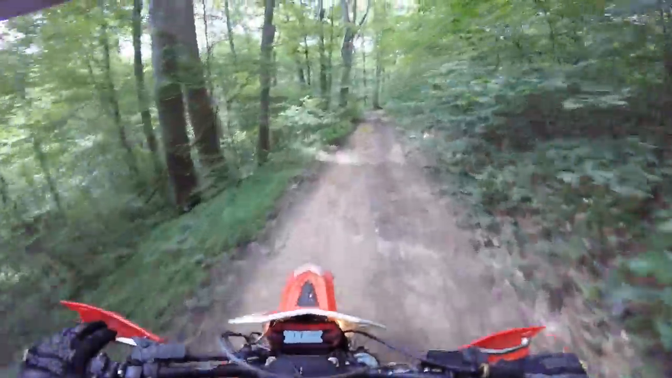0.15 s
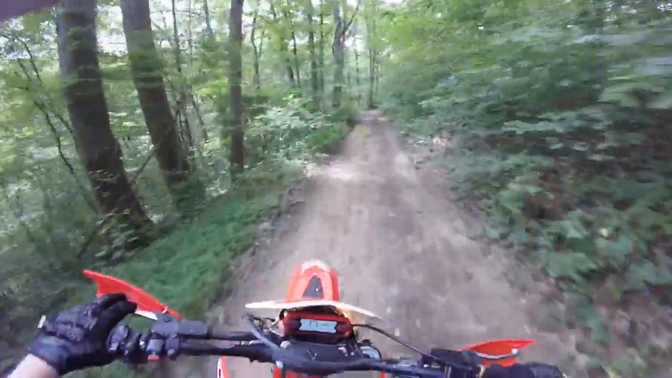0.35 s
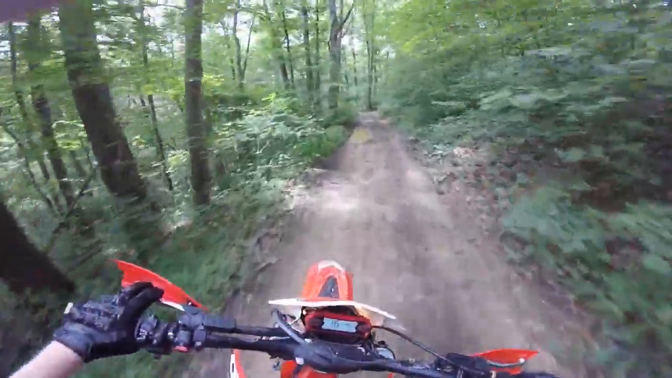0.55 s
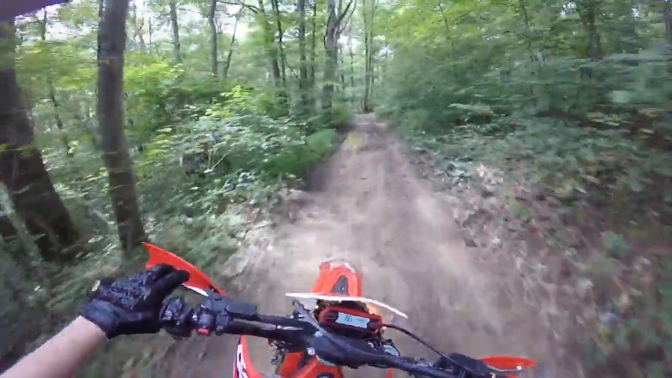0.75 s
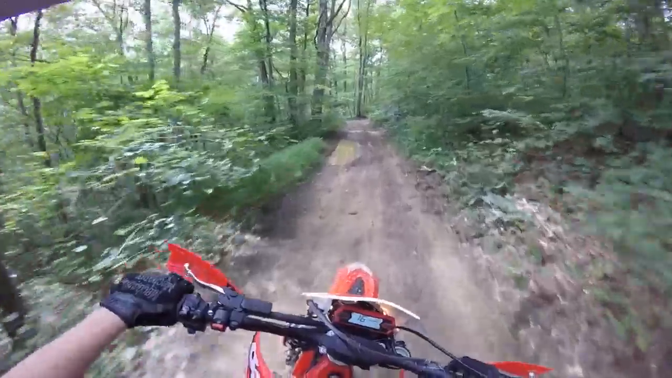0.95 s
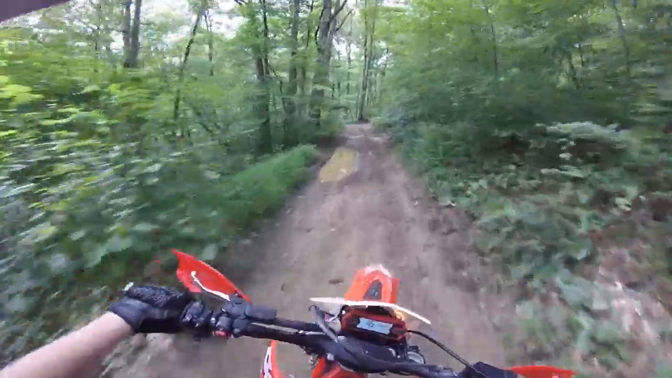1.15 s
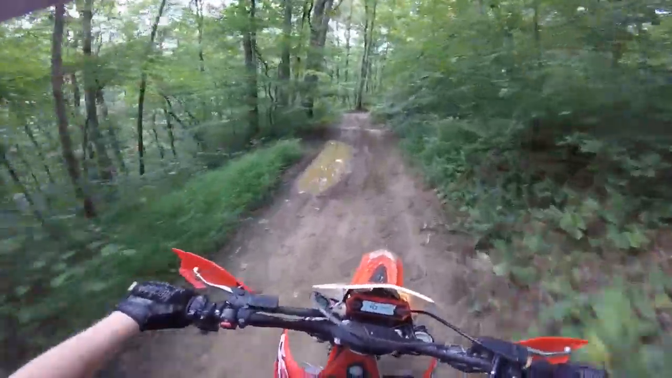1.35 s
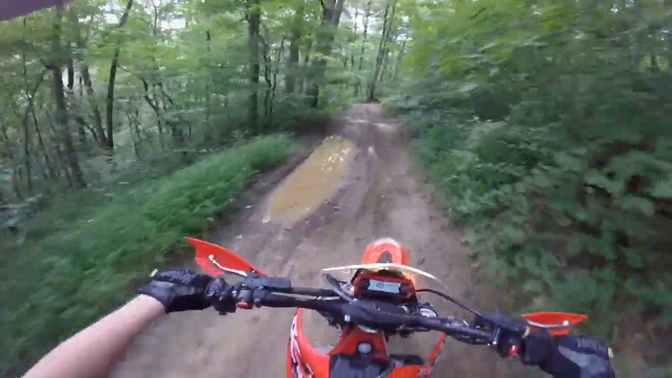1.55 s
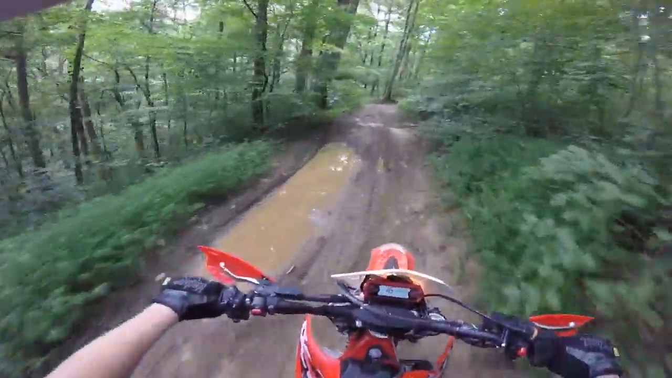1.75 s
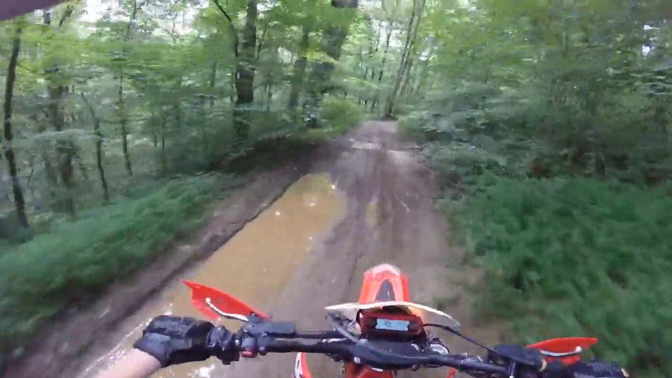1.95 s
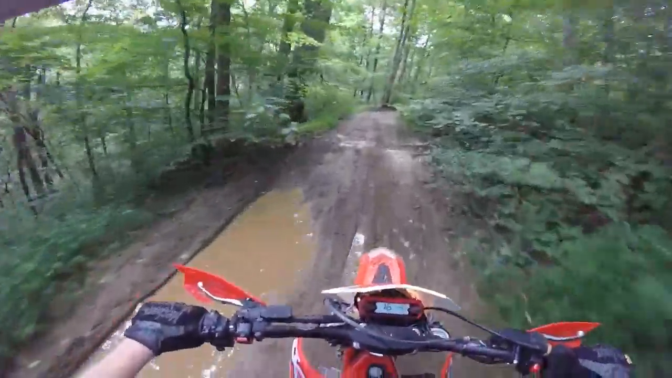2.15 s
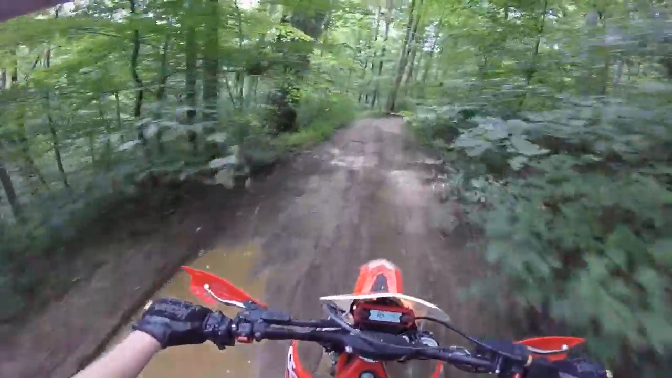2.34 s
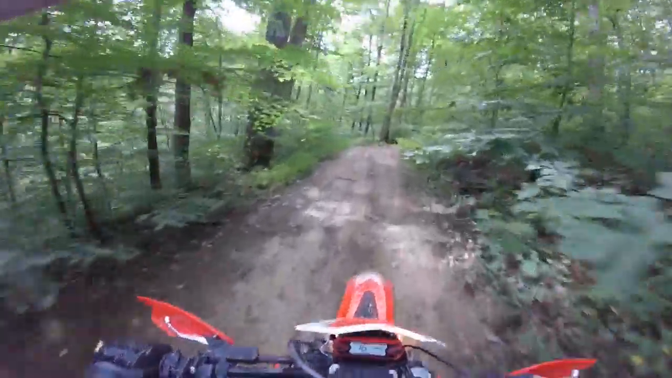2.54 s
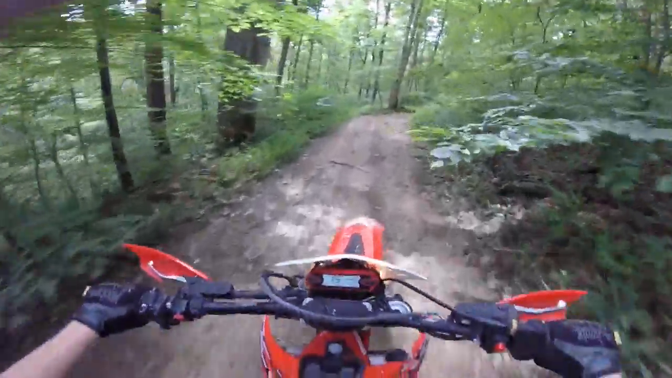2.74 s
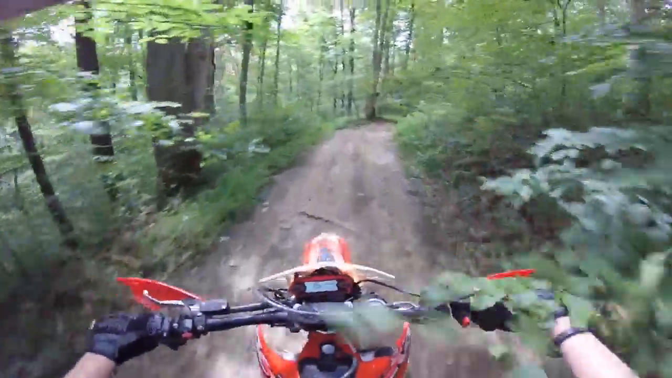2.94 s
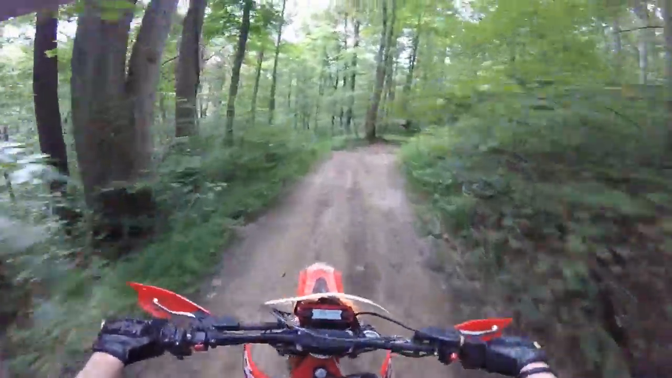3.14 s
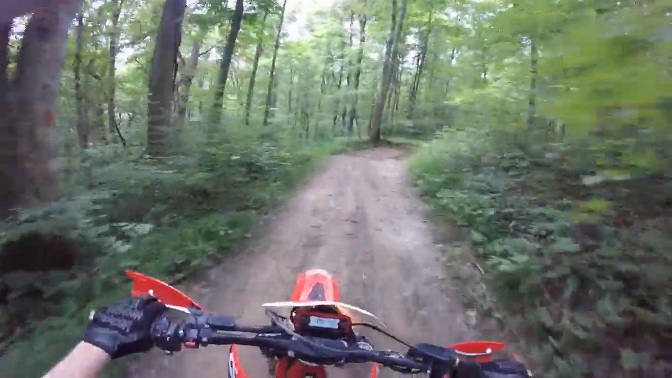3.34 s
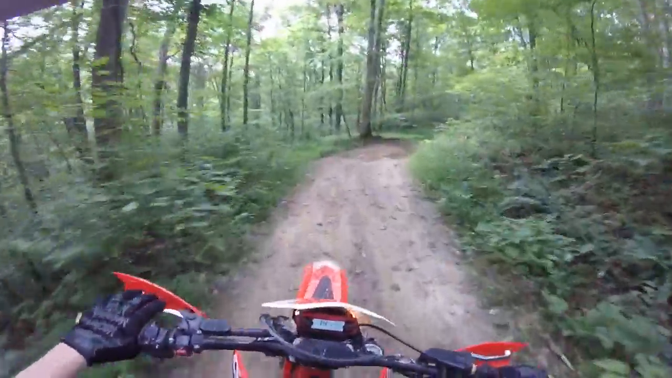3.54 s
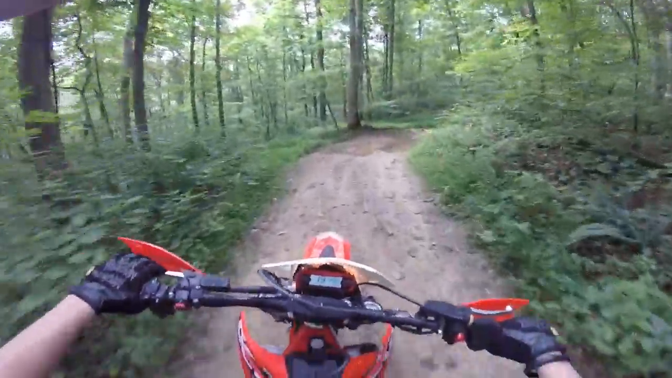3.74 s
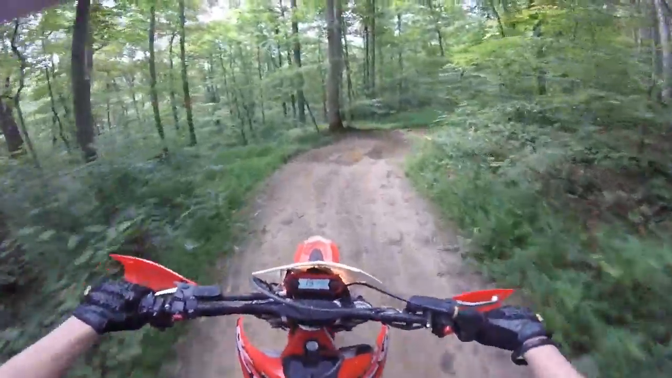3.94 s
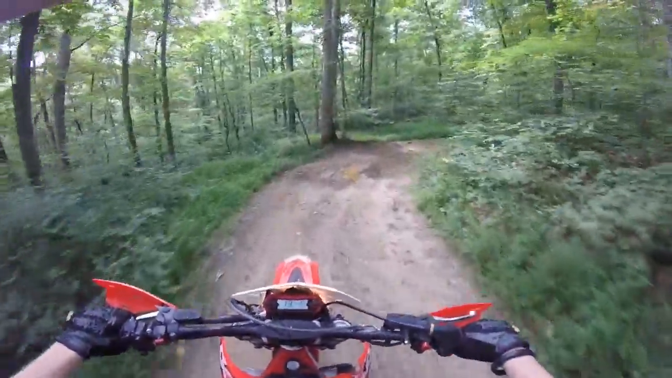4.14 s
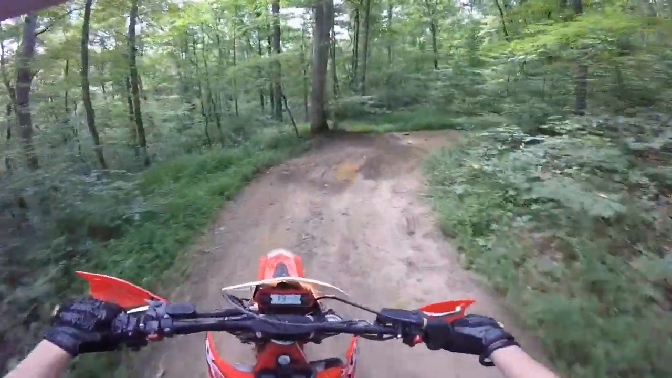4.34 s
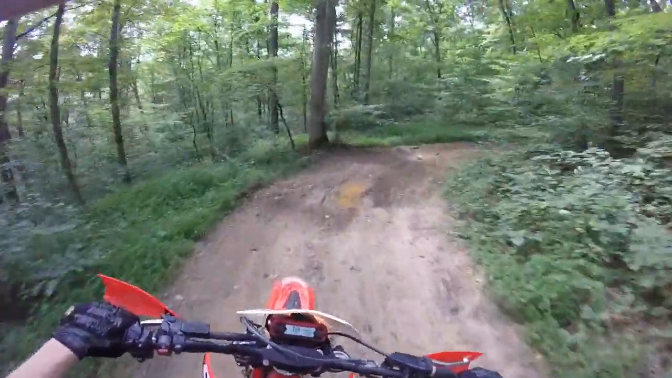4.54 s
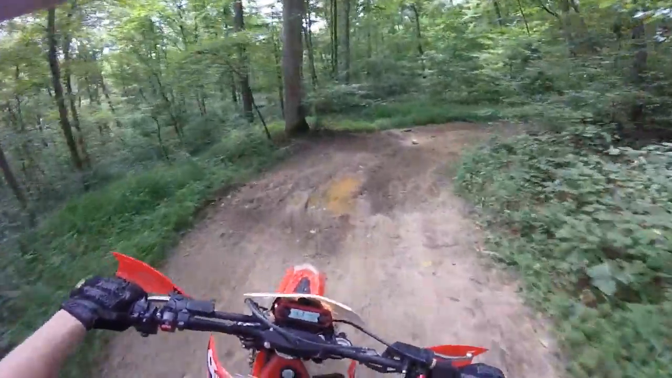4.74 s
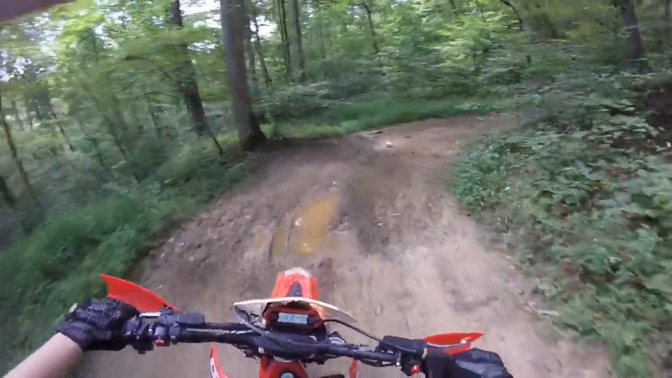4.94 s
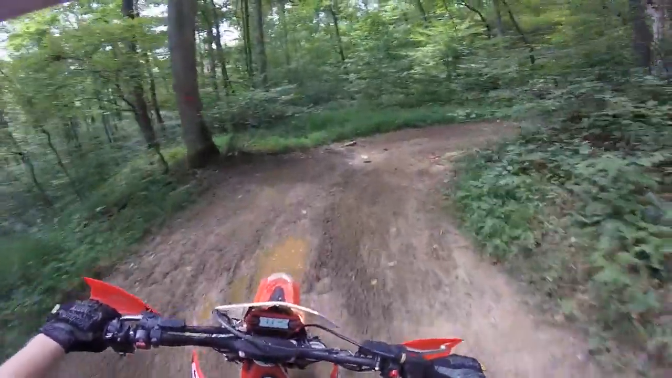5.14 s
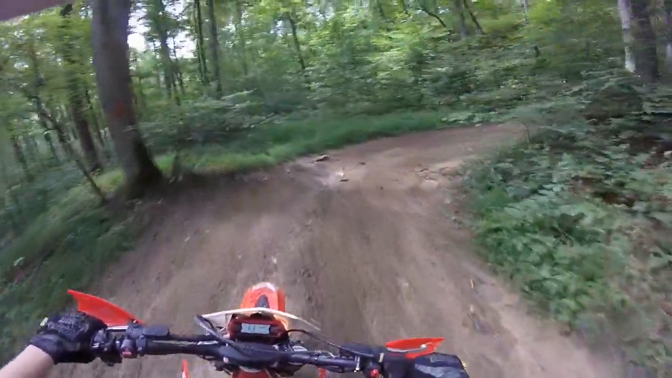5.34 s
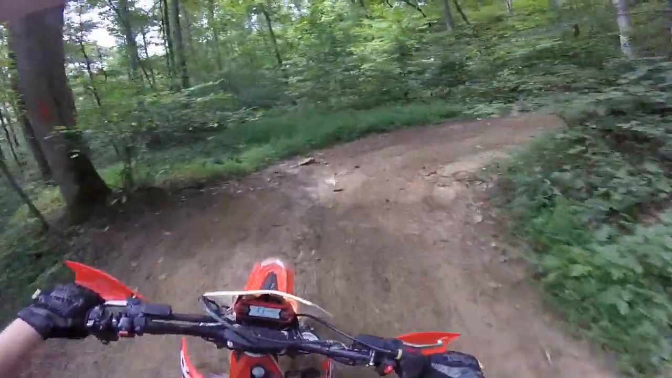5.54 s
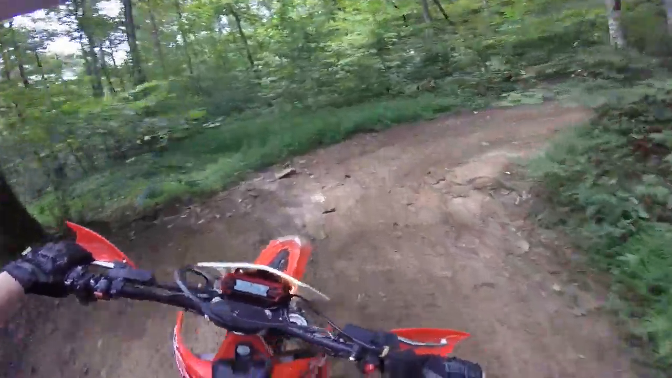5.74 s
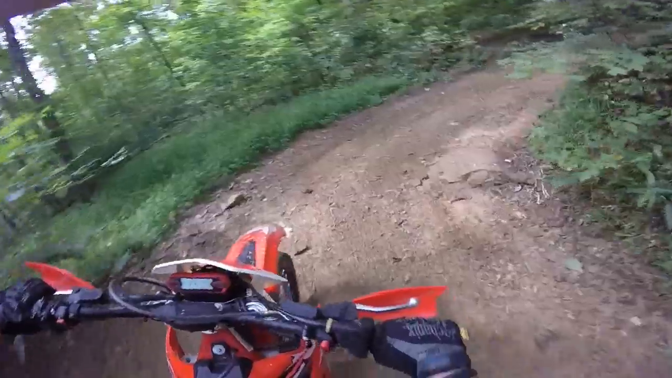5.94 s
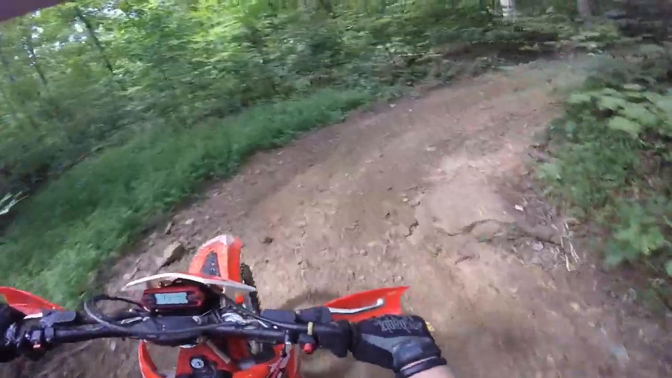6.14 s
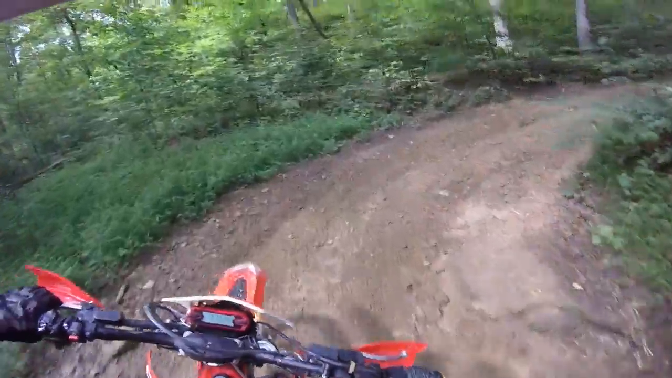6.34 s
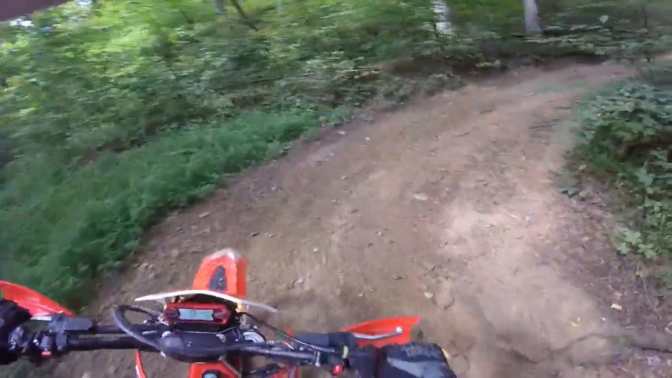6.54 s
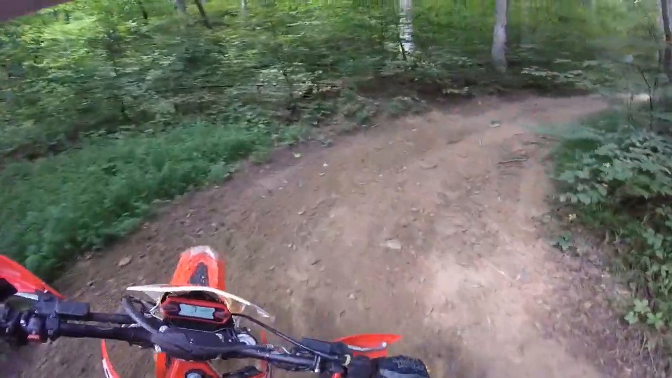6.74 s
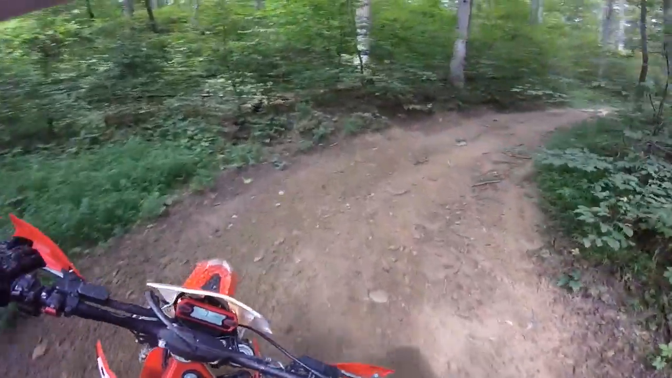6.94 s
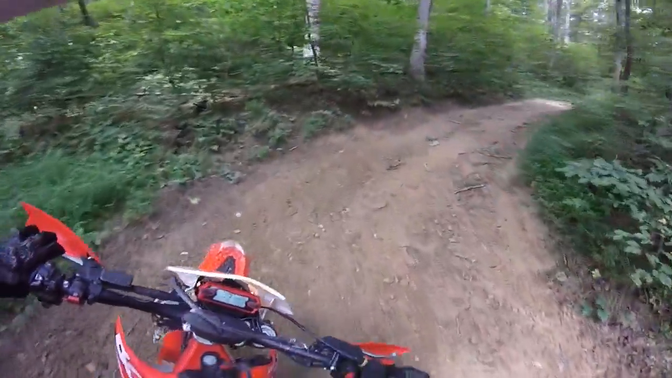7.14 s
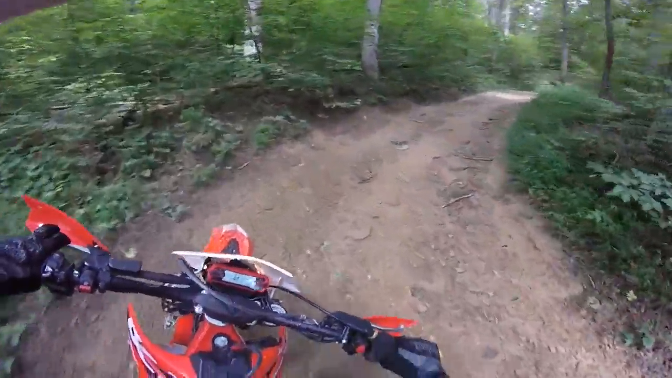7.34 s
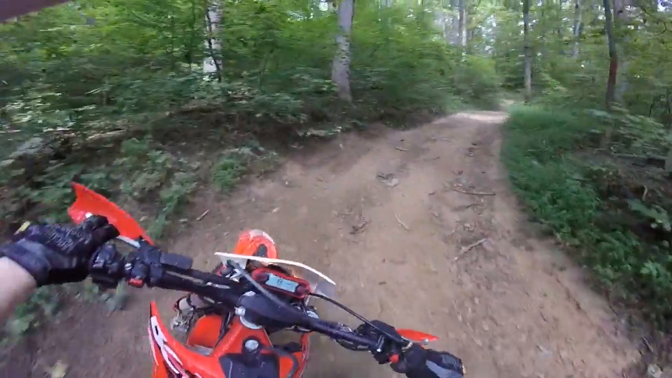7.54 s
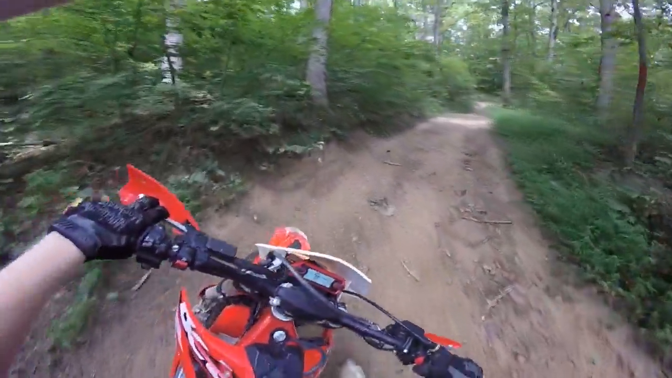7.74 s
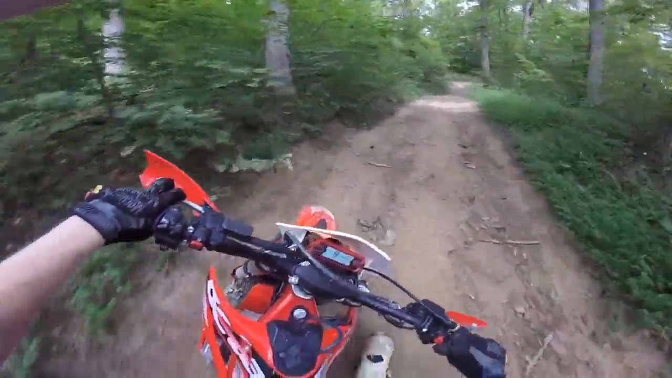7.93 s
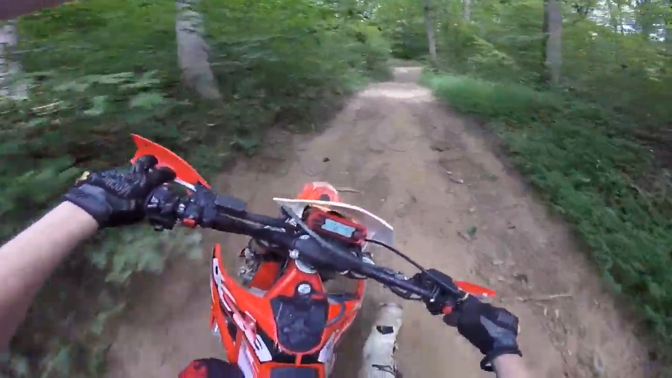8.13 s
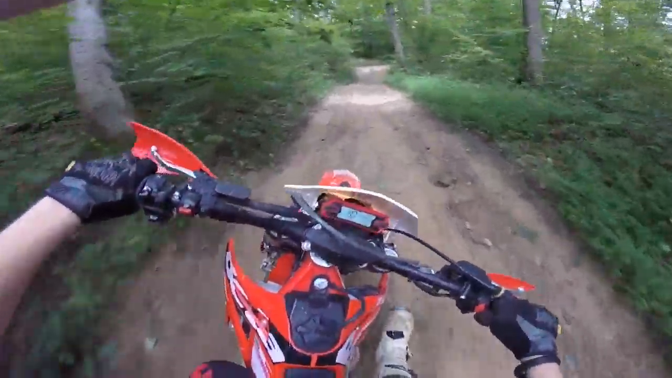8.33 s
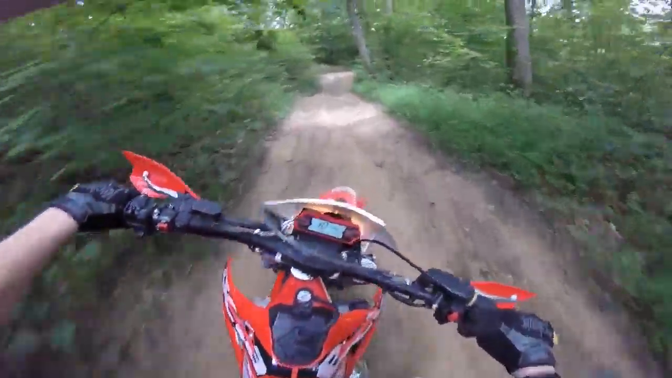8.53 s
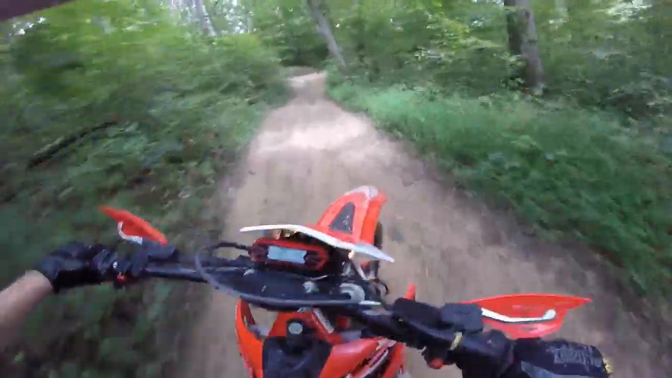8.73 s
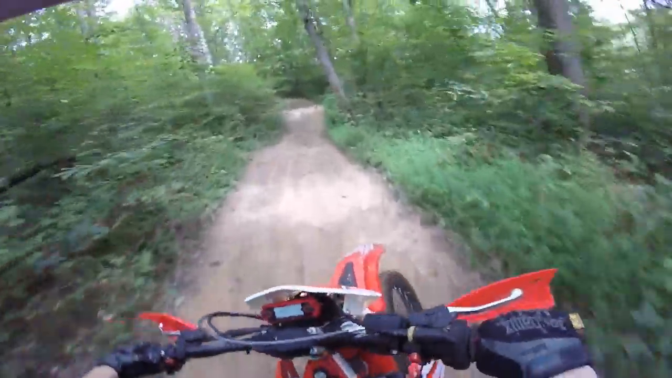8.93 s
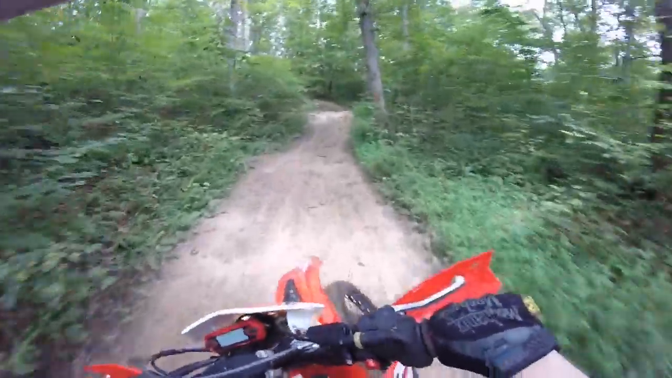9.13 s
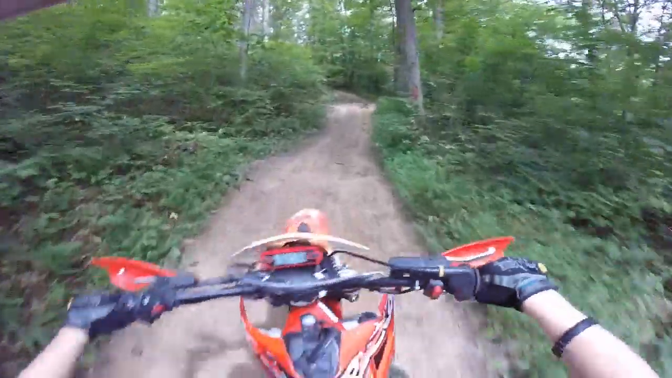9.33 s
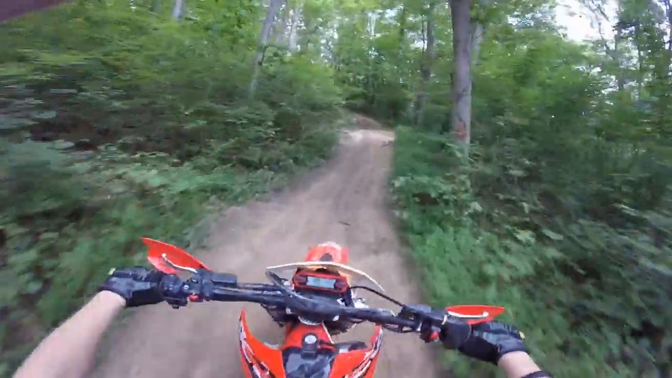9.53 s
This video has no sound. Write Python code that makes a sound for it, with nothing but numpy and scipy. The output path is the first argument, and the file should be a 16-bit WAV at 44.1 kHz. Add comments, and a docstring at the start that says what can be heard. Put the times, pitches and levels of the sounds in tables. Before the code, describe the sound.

A small two-stroke dirt bike drones off the throttle down a forest trail, popping and sputtering, slows, then pulls hard with a rising bark.

```python
"""A two-stroke dirt bike engine on a forest trail, heard at the rider's helmet.
Pulses timed by the crankshaft excite pipe and airbox spectra: a drone off the throttle, two hard pulls on it.
Lone firings pop as decaying pipe modes; light throttle adds burbles; pops under load ping the barrel.
Filtered noise gives piston and gear rattle, tyre hiss, scrubs, knocks and lumpy wind.
A limiter ducks everything at loud peaks and recovers slowly."""
import sys
import numpy as np
from scipy import signal
from scipy.fft import rfft, irfft, next_fast_len
from scipy.io import wavfile
from scipy.ndimage import uniform_filter1d, minimum_filter1d

SR = 44100
rng = np.random.default_rng(int(sys.argv[2]) if len(sys.argv) > 2 else 0)


def digitize_waveform(pressure):
    """Quantize a signal to 16-bit integers and store it at the path in sys.argv[1].

    Rows of a 2-D input are taken as channels; values are limited to [-1, 1].
    """
    field = np.atleast_2d(pressure).T
    bounded = np.clip(field, -1, 1)
    quanta = np.round(bounded * 32767).astype(np.int16)
    wavfile.write(sys.argv[1], SR, quanta)


N = 426888
TIME = np.arange(N) / SR


# crankshaft speed: (time [s], speed [rev/s])
CRANK_SPEED = [(0, 52.9), (.2, 51.4), (.33, 53), (.44, 52.6), (.54, 51), (.6, 53), (.78, 51.3), (.99, 52.1),
               (1.12, 50.3), (1.2, 50.8), (1.33, 49.8), (1.42, 54), (1.95, 50.7), (2.09, 48.3),
               (2.18, 51.4), (2.27, 51), (2.47, 48.6), (2.6, 54), (2.86, 47), (2.94, 52), (3.18, 40.5),
               (3.38, 45.4), (3.7, 41.2), (3.81, 42.8), (4.2, 37.7), (4.4, 36.3), (5.0, 34.8), (5.78, 34.9),
               (6.2, 45.5), (6.45, 42), (6.66, 50.5), (6.75, 51), (6.95, 41), (7.1, 45), (7.3, 40.5),
               (7.68, 42.5), (7.76, 45), (7.9, 45.2), (8.0, 52.2), (8.085, 55.3), (8.18, 50), (8.27, 57.6),
               (8.32, 53.4), (8.4, 59.6), (8.53, 61.4), (8.62, 67.8), (8.72, 70), (8.92, 51.5),
               (9.09, 48.5), (9.15, 60), (9.2, 75), (9.25, 82), (9.335, 75.3), (9.48, 73.3), (9.68, 57)]


def crank_rev_per_s():
    """Engine speed at every sample."""
    return in_time(CRANK_SPEED)[0]


def by_revs(level_db, per_octave_db, cruise_rev_per_s=50):
    """Gain: level_db at cruising revs, plus per_octave_db for each doubling of engine speed."""
    return from_db(level_db + per_octave_db * np.log2(crank_rev_per_s() / cruise_rev_per_s))


def port_openings():
    """The exhaust port opens once a revolution; the phase is bent so that pops fall on openings."""
    turns = np.cumsum(crank_rev_per_s()) / SR
    pop_s = pops()[0]
    phase_error = np.unwrap(np.interp(pop_s, TIME, turns), period=1)
    turns = turns - np.interp(TIME, pop_s, phase_error)
    return TIME[1:][np.diff(np.floor(turns)) > 0]


# pulls on the throttle: (start [s], end [s], gain [dB])
THROTTLE_PULLS = [(6.949, 8.79, -5), (9.073, 9.464, -12)]


def throttle(open_s=0.013, close_s=0.019):
    """One row per pull: 1 while the throttle is open, 0 while coasting."""
    return np.array([held(start, end, open_s, close_s) for start, end, *_ in THROTTLE_PULLS])


def load():
    """How hard the engine pulls as a gain, 0 while coasting."""
    return from_db(np.transpose(THROTTLE_PULLS)[2]) @ throttle()


# throttle opening during the pulls: (time [s], level [dB])
THROTTLE_OPENING = [(6.95, -4.5), (7.88, -3), (7.97, -1), (8.1, 4), (8.17, -1), (8.24, -1), (8.32, 2),
                    (8.6, -3), (8.69, -6), (8.78, -23), (9.1, -1.5), (9.47, -17.5)]
# exhaust resonances under throttle, from low to high revs: (frequency [Hz], relative level [dB])
LUGGING_SPECTRUM = [(45,-24), (90,-8.5), (150,-24.5), (220,-9), (268,5), (310,-3.5), (360,-14.5), (405,0),
                    (455,-9.5), (575,-10), (640,-29), (730,-38), (1500,-65.5)]
MIDRANGE_SPECTRUM = [(55,-17), (110,-8.5), (175,-20), (240,5.5), (300,3.5), (325,3.5), (372,-18), (435,-6),
                     (490,-4), (600,-26.5), (670,-12), (770,-33), (830,-60), (925,-23), (1050,-55),
                     (1400,-33), (1600,-60)]
ON_THE_PIPE_SPECTRUM = [(69,-21.5), (138,-20), (207,-11), (276,0.5), (345,-6.5), (414,-6), (483,-9.5),
                        (620,-5), (690,-14), (830,-53), (1350,-36), (1600,-50)]
FLAT_OUT_SPECTRUM = [(78,-11.5), (155,-14), (235,-6), (305,3.5), (385,-5), (485,1), (570,-2), (650,2),
                     (730,-5.5), (820,-24), (1000,-61), (1300,-16), (1600,-54)]
# crossfades from each exhaust spectrum to the next: (from [rev/s], to [rev/s])
SPECTRUM_SHIFTS = [(46, 52), (62, 66), (71, 74)]
# hiss of the gas jet: (frequency [Hz], relative level [dB])
RASP_SPECTRUM = [(1800,-10), (2500,-2.5), (3200,4.5), (3800,-3), (4500,-1.5), (5600,-6.5), (6150,-0.5),
                 (6800,2.5), (7500,-5), (9000,-6.5), (10500,-11.5), (15000,-20)]


def pulling(openings, bark_hz=400, bark_db=0.0, boom_follows=0.22, echo_s=0.00442):
    """Every turn fires: the expansion chamber booms evenly, the silencer barks roughly, the jet rasps."""
    boom_turbulence, bark_turbulence = 0.06, 0.2
    silencer_echo, echo_wander = 0.35, 0.05
    revs = crank_rev_per_s()
    open_db, = in_time(THROTTLE_OPENING)
    boom_gain = from_db(boom_follows * open_db)

    firings = -scatter(openings - .002, spread_db=.5, jitter_s=.00003)
    gas = steady(noise() * fade(firings, 0.019))
    boom = diffuse(steady(firings) + boom_turbulence * gas, delays_s=(.0036,), echo=-0.51)

    cracks = -scatter(openings - .002, spread_db=1.5, jitter_s=.00005)
    bark = steady(cracks) + bark_turbulence * gas
    # the silencer echo's delay wanders at random, so its resonances shift
    echo_time = TIME - echo_s * (1 + echo_wander * drift(11))
    bark = steady(bark + silencer_echo * np.interp(echo_time, TIME, bark))

    low = crossover(boom, bark_hz, "low") * boom_gain
    high = crossover(bark, bark_hz, "high") * from_db(bark_db + open_db)
    blasts = low + high

    # the exhaust resonances shift with the revs
    note = colour(blasts, LUGGING_SPECTRUM)
    higher_spectra = (MIDRANGE_SPECTRUM, ON_THE_PIPE_SPECTRUM, FLAT_OUT_SPECTRUM)
    for spectrum, speeds in zip(higher_spectra, SPECTRUM_SHIFTS):
        note = note + np.interp(revs, speeds, (0, 1)) * (colour(blasts, spectrum) - note)
    note = steady(note) * boom_gain * by_revs(level_db=3.0, per_octave_db=13.5)
    rasp = steady(colour(gas, RASP_SPECTRUM)) * by_revs(level_db=-28.0, per_octave_db=18.5)
    return load() * (note + rasp)


# runs of evenly spaced lone firings:
# (first [s], last [s], count, peak of the ringing [dB], extra ring of the upper modes [dB])
LONE_FIRINGS = [(1.348, 1.348, 1, -12, -13), (1.368, 1.444, 3, 0.5, 1), (1.461, 1.575, 4, 5, 1),
                (1.6316, 1.7094, 3, 5.5, 4), (1.7477, 1.8049, 2, 1, 15), (1.7662, 1.8812, 3, 7.5, 1),
                (2.521, 2.521, 1, 1, 7), (2.615, 2.632, 2, 2.5, 0), (2.917, 2.956, 2, 6.5, -1),
                (4.264, 4.264, 1, -2, 13), (4.536, 4.617, 2, -13, -2), (4.813, 4.978, 2, -3.5, -4),
                (5.1746, 5.316, 2, -4, 3), (5.46, 5.517, 2, -10, -5), (5.577, 5.634, 2, -4.5, -2),
                (5.719, 5.719, 1, -12, 0), (5.804, 5.860, 2, -3, 3), (5.884, 6.034, 3, -1, -1),
                (6.104, 6.237, 3, 4, 1.5), (6.324, 6.324, 1, 0, -2), (6.5082, 6.5966, 3, 5.5, 3),
                (6.656, 6.657, 1, 9, -4), (6.733, 6.881, 2, -2, -6), (6.976, 7.023, 2, 7, 5),
                (7.3, 7.449, 4, 7.5, -4), (7.495, 7.734, 6, 5.5, 6.5), (8.772, 8.772, 1, 4, 7),
                (9.121, 9.171, 4, 1, 12), (9.4867, 9.549, 2, 12.5, 2), (9.612, 9.612, 1, 7, 2)]


def pops():
    """Times [s], peaks [dB] and extra ring [dB] of all lone firings, in order."""
    firings = []
    for first, last, count, peak_db, ring_db in LONE_FIRINGS:
        for s in np.linspace(first, last, round(count)):
            firings.append((s, peak_db, ring_db))
    return np.transpose(sorted(firings))


# pipe ring after a pop: (frequency [Hz], near idle [dB], on the overrun [dB], under load [dB],
# extra at high revs [dB], t60 [s])
PIPE_RING_MODES = [(83,6,-5.5,-14,-13,0.026), (186,-22,-5.5,-55,7,0.055), (240,-17,-3.5,10,0,0.14),
                   (347,11.5,2,-7,-2.5,0.059), (515,-17,-0.5,9,2,0.022), (625.5,-9,-1.5,-8.5,2,0.048),
                   (1260,-11,-20,-18,-4,0.026)]
# gas jet of a pop: (frequency [Hz], relative level [dB])
SPIT_SPECTRUM = [(1800, 3.5), (3100, 10.5), (4500, 3.5), (7000, 11), (9000, 5), (12000, -0.5), (15000, -8)]


def popping(detune=0.081, rise_cycles=1.0, silencer_lag_s=0.00473, silencer_echo=0.94, size=4000):
    """Mixture piles up and fires at once; the pipe rings, each mode detuned at random from pop to pop."""
    s, peak_db, ring_db = pops()
    bangs = np.zeros(N + size)
    hz, idle_db, overrun_db, loaded_db, fast_db, t60 = np.transpose(PIPE_RING_MODES)[:, :, None]
    t = (np.arange(size) - size // 10) / SR
    upper = hz > 400
    # near idle the charge burns lazily and knocks low; under load the chamber booms
    revs = np.interp(s, TIME, crank_rev_per_s())
    lazy = np.interp(revs, (38, 43), (1, 0))
    fast = np.interp(revs, (46, 51), (0, 1))
    loaded = np.interp(s, TIME, throttle().sum(axis=0))

    for k, detuning in enumerate(rng.standard_normal((len(s), len(hz), 1))):
        struck_db = overrun_db + lazy[k] * (idle_db - overrun_db)
        struck_db = struck_db + loaded[k] * (loaded_db - overrun_db)
        struck_db = struck_db + fast[k] * fast_db + ring_db[k] * upper
        wave = 0
        # the silencer throws the upper modes back a second time
        for age_s, share in ((t, 1), (t - silencer_lag_s, silencer_echo * upper)):
            cycles = hz * (1 + detune * detuning) * age_s
            swell = np.exp(-(np.minimum(cycles, 0) / rise_cycles) ** 2)
            decay = from_db(struck_db - 60 * np.maximum(age_s, 0) / t60)
            wave = wave + np.sum(share * swell * decay * np.cos(2 * np.pi * cycles), axis=0)
        start = int((s[k] + t[0]) * SR)
        bangs[start:start + size] += from_db(peak_db[k]) * wave / wave.max()

    jet = uniform_filter1d(fade(clicks(s - .003, from_db(peak_db)), 0.011), size=160)
    spit = jet * rms_one(colour(noise(), SPIT_SPECTRUM))
    return bangs[:N] + spit * by_revs(level_db=-29.5, per_octave_db=-7.5)


# light throttle, turns half burn: (start [s], end [s], level [dB])
LIGHT_THROTTLE = [(1.378, 1.897, -19), (2.498, 2.657, -14.5), (2.827, 3, -24), (5.824, 6.276, -21.5),
                  (6.442, 6.654, -19)]
# half-burnt charge: (frequency [Hz], relative level [dB])
THUMP_SPECTRUM = [(120, -15.5), (195, 1), (290, 9), (370, -21), (450, -4.5), (620, -2), (800, -24)]


def burbling(openings, attack_s=0.021, release_s=0.016):
    """A half-burnt charge leaves the pipe as one soft, short thump each turn."""
    charges = -scatter(openings - .002, spread_db=2.0, jitter_s=.0002)
    strength = 0
    for start, end, db in LIGHT_THROTTLE:
        strength = strength + from_db(db) * held(start, end, attack_s, release_s)
    return strength * steady(colour(charges, THUMP_SPECTRUM))


def drone_return(dip_db=-3.0, return_s=0.22):
    """The drone gain is down when the throttle shuts and takes a moment to come back."""
    shut_s = [end for _, end, _ in THROTTLE_PULLS + LIGHT_THROTTLE]
    return from_db(dip_db * np.minimum(fade(clicks(shut_s, 1), return_s), 1))


# pipe, single turn near idle, airbox, airbox at low revs: (frequency [Hz], relative level [dB])
DRONE_SPECTRUM = [(50,-8.5), (75,-13.5), (103,1.5), (150,-9.5), (205,-9), (260,3), (315,3.5), (365,-1),
                  (415,-10.5), (475,-4.5), (540,-5.5), (630,-5.5), (730,-9.5), (860,-28.5)]
CHUFF_SPECTRUM = [(60,-23), (90,-11), (150,-6), (230,4), (290,6), (340,4), (385,4.5), (440,-21), (600,-35),
                  (800,-15)]
INTAKE_SPECTRUM = [(600, -14), (780, -1), (1000, -2.5), (1200, 1), (1370, -3.5), (1550, -25), (2000, -21)]
SLOW_INTAKE_SPECTRUM = [(600, -16.5), (800, -6), (980, -3.5), (1200, 3.5), (1340, -4.5), (1550, -14),
                        (2000, -34)]


def coasting(openings, turbulence_hz=430, eddies=0.36, breakup=0.72, idle_db=-0.5, chuff_db=-4):
    """Pumped unburnt air gives a soft pulse and a turbulent puff each turn, through pipe and airbox."""
    revs = crank_rev_per_s()
    pulses = -scatter(openings - .002, spread_db=1.2, jitter_s=.00007)
    puffs = steady(noise() * (fade(-pulses, 0.15) + 1.3))
    # low orders stay nearly clean, higher ones drown in turbulence
    high_pass = signal.butter(4, turbulence_hz, "high", fs=SR, output="sos")
    puffs = eddies * steady(noise()) + 1.15 * signal.sosfilt(high_pass, puffs)

    # near idle the drone breaks up into separate chuffs
    idling = np.interp(revs, (38, 47), (1, 0))
    hum = diffuse(steady(pulses), delays_s=(.0067,), echo=-0.69) * (1 - breakup * idling)
    drone = steady(colour(hum + puffs, DRONE_SPECTRUM)) * from_db(idle_db * idling)
    drone = drone + idling * from_db(chuff_db) * steady(colour(pulses, CHUFF_SPECTRUM))

    gulps = scatter(openings + .012, spread_db=2.2, jitter_s=.00004)
    rush = steady(noise() * (fade(gulps, 0.033) + 5.0))
    air = diffuse(steady(gulps) + .7 * rush, delays_s=(.0023,), echo=.5)
    # at low revs the airbox has its own spectrum and more distinct gulps
    slow = np.interp(revs, (46, 51), (1, 0))
    slow_honk = steady(colour(steady(gulps) + 0.66 * air, SLOW_INTAKE_SPECTRUM))
    fast_honk = steady(colour(air, INTAKE_SPECTRUM))
    honk = steady(slow * slow_honk + (1 - slow) * fast_honk)

    drone = drone * drone_return() * by_revs(level_db=-15.5, per_octave_db=11.0)
    return drone + honk * by_revs(level_db=-29.5, per_octave_db=7.5)


def pinging(ping_db=-18, ping_hz=3050, ring_s=0.11, early_s=0.0045):
    """Under load each lone firing pings in the barrel, just before its pop leaves the pipe."""
    strikes = scatter(pops()[0] - early_s, spread_db=1.2, jitter_s=.0003) * load()
    return from_db(ping_db) * fade(strikes, 0.0062) * rms_one(ring(noise(), ping_hz, ring_s))


# piston and gears; tyres and chain: (frequency [Hz], relative level [dB])
RATTLE_SPECTRUM = [(1450, -28), (1650, -25), (1900, -2.5), (2250, -6), (2600, -14.5), (3000, 0.5),
                   (3280, 8), (3600, -7.5), (4150, -8.5), (4700, -9), (6800, -7), (9000, -14.5),
                   (15000, -56)]
HISS_SPECTRUM = [(1500, -3), (2000, 10), (2600, 0.5), (3300, 6.5), (4300, 8), (4900, 3), (5700, -0.5),
                 (6800, 4.5), (8000, -4.5), (10000, -9), (12500, -14), (15000, -19)]


def running_gear(openings, grit_db=1.5, uneven_db=2.0, top_hiss_db=-28.0):
    """The piston slaps unevenly once a turn, the gears whirr; tyres and chain hiss on damp dirt."""
    slaps = fade(scatter(openings + .014, spread_db=2.0, jitter_s=.001), .0055)
    slap_noise = colour(noise() * uniform_filter1d(slaps, size=130), RATTLE_SPECTRUM)
    ticks = steady(crossover(slap_noise, 5700, "low")) * from_db(uneven_db * drift(12))
    whirr = steady(colour(noise(), RATTLE_SPECTRUM))
    grit = noise() * from_db(grit_db * drift(320) + 2.0 * drift(27))
    hiss_gain = np.minimum(by_revs(level_db=-37.5, per_octave_db=12.5), from_db(top_hiss_db))
    hiss = rms_one(colour(grit, HISS_SPECTRUM)) * hiss_gain
    ticks = ticks * by_revs(level_db=-42.5, per_octave_db=-20)
    return ticks + whirr * by_revs(level_db=-38.5, per_octave_db=2) + hiss


# tyre scrubs under braking: (start [s], end [s], grit [dB], spray [dB]), before the bite boost
TYRE_SCRUBS = [(2.754, 2.802, -50, -35), (2.975, 3.136, -35, -31.5), (5.293, 5.98, -35.5, -40)]
# dirt flung off the tyre: (frequency [Hz], relative level [dB])
SPRAY_SPECTRUM = [(2000,0), (3600,-7), (4600,0.5), (5500,-2), (6500,0.5), (8000,-4), (12000,-13.5),
                  (15000,-24)]


def scrubbing_tyre(attack_s=0.013, release_s=0.079, uneven_db=1.5, bite=0.62, bite_s=0.12,
                   pebbles_per_s=500, pebble_share=1.0):
    """Under braking the tyre bites, grinds over the dirt and flings up soil and pebbles unevenly."""
    spans = []
    for start, end, *_ in TYRE_SCRUBS:
        bite_gain = 1 + bite * np.exp(-np.abs(TIME - start) / bite_s)
        spans.append(held(start, end, attack_s, release_s) * bite_gain)
    grit, spray = from_db(np.transpose(TYRE_SCRUBS)[2:]) @ np.array(spans)
    hits = noise() * (rng.random(N) < pebbles_per_s / SR)
    pebbles = rms_one(noise() * fade(hits, .0006))
    grinding = grit * rms_one(colour(noise(), HISS_SPECTRUM))
    flung = spray * rms_one(colour(noise() + pebble_share * pebbles, SPRAY_SPECTRUM))
    return (grinding + flung) * from_db(uneven_db * drift(60))


# knocks: chassis bumps, and at 2.51 s a detonation ping with a thud:
# (time [s], thud [dB], clack [dB], chink [dB])
KNOCK_LEVELS = [(0.116,-24,-40,-21), (2.51,-16,-21,-42), (4.133,-24,-22,-41), (4.14,-24,-21.5,-33),
                (4.188,-28,-49,-53), (4.199,-11.5,-46,-50), (4.247,-30,-25,-40), (4.284,-19,-19.5,-40),
                (4.706,-14.5,-45,-39)]
# wheels dropping into ruts: (time [s], level [dB])
RUT_DROPS = [(4.24, -14), (4.295, -11), (4.36, -16.5), (4.52, -13)]
# thud, clack, chink, suspension thump: (frequency [Hz], relative level [dB])
THUD_SPECTRUM = [(250,-18), (520,5), (1150,1), (1600,-18), (3000,-33)]
CLACK_SPECTRUM = [(1200,-11), (2000,-4), (2600,-8), (3200,6.5), (4200,-7), (7000,-8.5), (10000,-22),
                  (15000,-30)]
CHINK_SPECTRUM = [(3000,2), (5500,-15), (6400,6), (7500,-8), (10000,-7), (15000,-42)]
SUSPENSION_SPECTRUM = [(50,-21), (90,1), (190,-5), (300,-8), (600,-38)]


def knocking():
    """Chassis bumps and one detonation ping as decaying thud, clack and chink; ruts thump the suspension."""
    s, *levels = np.transpose(KNOCK_LEVELS)
    spectra, decays_s = (THUD_SPECTRUM, CLACK_SPECTRUM, CHINK_SPECTRUM), (0.006, 0.009, 0.011)
    knocks = 0
    for db, spectrum, decay_s in zip(levels, spectra, decays_s):
        knocks = knocks + rms_one(colour(noise(), spectrum)) * fade(clicks(s, from_db(db)), decay_s)
    rut_s, rut_db = np.transpose(RUT_DROPS)
    jolts = uniform_filter1d(fade(clicks(rut_s, from_db(rut_db)), 0.038), size=300)
    return knocks + jolts * steady(colour(noise(), SUSPENSION_SPECTRUM))


# wind before its lumps: (time [s], level [dB])
WIND_LEVEL = [(0, -15), (.3, -22.5), (3.1, -22.5), (3.8, -26), (4.35, -23.5), (4.7, -26.5), (9.68, -24.5)]
# wind: (frequency [Hz], relative level [dB])
GUST_SPECTRUM = [(15,-9), (30,-4), (55,-1), (90,-1), (170,-6), (300,-18), (700,-33), (1500,-55)]


def wind(lumpy_db=1.2):
    """Eddies buffet the microphone: low noise with a wandering level."""
    level_db = in_time(WIND_LEVEL)[0] + lumpy_db * drift(19)
    return rms_one(colour(noise(), GUST_SPECTRUM)) * from_db(level_db)


def from_db(db):
    """Decibels to amplitude."""
    return 10 ** (np.asarray(db) / 20)


def rms_one(x):
    """Scales the whole signal to rms 1."""
    return x / np.sqrt(np.mean(x ** 2) + 1e-20)


def in_time(rows):
    """The columns of a curve at every sample."""
    s, *columns = np.transpose(rows)
    return [np.interp(TIME, s, c) for c in columns]


def noise():
    """White noise."""
    return rng.standard_normal(N)


def drift(knots_per_s):
    """Random curve of rms 1, linear between knots."""
    knots = rng.standard_normal(4000)
    return rms_one(np.interp(TIME * knots_per_s, np.arange(len(knots)), knots))


def colour(x, spectrum, size=4096):
    """Minimum-phase filter with the given spectrum: a click rings on in its resonances."""
    hz, db = np.transpose(spectrum)
    log_hz = np.log(hz)
    grid = np.log(np.maximum(np.fft.rfftfreq(size, 1 / SR), 1))
    # beyond the end points the response falls off
    outside = np.abs(grid - np.clip(grid, log_hz[0], log_hz[-1]))
    response_db = np.interp(grid, log_hz, db) - 20 * outside
    # folding the cepstrum makes the filter causal
    cepstrum = irfft(np.log(from_db(response_db)))
    cepstrum[1:size // 2] *= 2
    cepstrum[size // 2 + 1:] = 0
    return signal.oaconvolve(x, irfft(np.exp(rfft(cepstrum))))[:N]


def steady(x, size=4400):
    """Holds the running rms near 1."""
    power = uniform_filter1d(uniform_filter1d(x ** 2, size), size)
    return x / np.sqrt(np.abs(power) + 1e-12)


def ring(x, hz, t60):
    """Resonator: a unit click sets a decaying sine ringing, t60 in s."""
    r, w = from_db(-60 / (t60 * SR)), 2 * np.pi * hz / SR
    return signal.lfilter([0, np.sin(w)], [1, -2 * r * np.cos(w), r * r], x + 1e-18)


def clicks(times_s, sizes):
    """One-sample clicks."""
    out = np.zeros(N)
    out[np.clip(np.round(np.asarray(times_s) * SR).astype(int), 0, N - 1)] = sizes
    return out


def fade(x, seconds):
    """Each click becomes an exponential decay of the same height."""
    return signal.lfilter([1], [1, -np.exp(-1 / (seconds * SR))], x + 1e-18)


def scatter(times_s, spread_db, jitter_s):
    """Clicks of uneven strength and timing."""
    chance = rng.standard_normal((len(times_s), 2))
    return clicks(times_s + jitter_s * chance[:, 1], from_db(spread_db * chance[:, 0]))


def held(start, end, attack_s, release_s):
    """Rises after the start, holds at 1 and has fallen by the end."""
    return np.clip(np.minimum((TIME - start) / attack_s, (end - TIME) / release_s), 0, 1)


def diffuse(x, delays_s, echo):
    """All-pass reflections between bike, rider and ground spread each pulse without colouring it."""
    size = next_fast_len(N + SR // 2)
    spectrum, echo = rfft(x, size), np.clip(echo, -.85, .85)
    for delay_s in delays_s:
        late = np.exp(-2j * np.pi * np.fft.rfftfreq(size, 1 / SR) * delay_s)
        spectrum = spectrum * (late - echo) / (1 - echo * late)
    return irfft(spectrum, size)[:N]


def crossover(x, hz, side):
    """The low or high side of a sound; the two add up to an even whole."""
    sos = signal.butter(2, hz, side, fs=SR, output="sos")
    return signal.sosfilt(sos, signal.sosfilt(sos, x))


def limiter(x, ceiling_db=-2.5, recovery_db_per_s=12.5, size=90):
    """Turns down just ahead of each peak over the ceiling, then comes back up at a steady rate."""
    over_db = np.maximum(20 * np.log10(np.abs(x) + 1e-9) - ceiling_db, 0)
    recovered_db = recovery_db_per_s * TIME
    gain_db = recovered_db - np.maximum.accumulate(over_db + recovered_db, axis=-1)
    return x * from_db(uniform_filter1d(minimum_filter1d(gain_db, size), size))


def scene():
    """Engine, running gear, tyre, knocks and wind in one channel."""
    openings = port_openings()
    engine = pulling(openings) + popping() + burbling(openings) + coasting(openings) + pinging()
    bike = engine + running_gear(openings) + scrubbing_tyre() + knocking()
    return (bike + wind())[None]


def record(dry, stop_hz=16000):
    """The limiter holds the peaks down and a steep low-pass cuts the top."""
    low_pass = signal.cheby2(14, 70, stop_hz, fs=SR, output="sos")
    return signal.sosfilt(low_pass, limiter(dry))


dry = scene()
out = record(dry)
digitize_waveform(out)
```